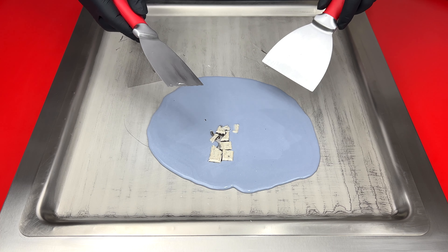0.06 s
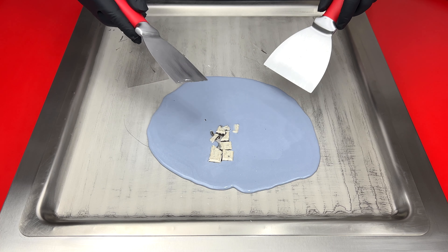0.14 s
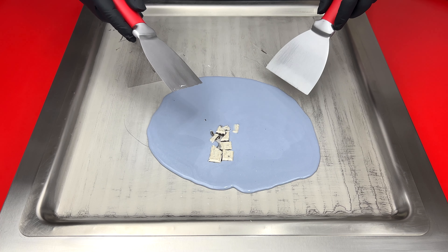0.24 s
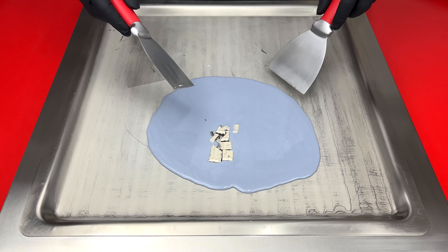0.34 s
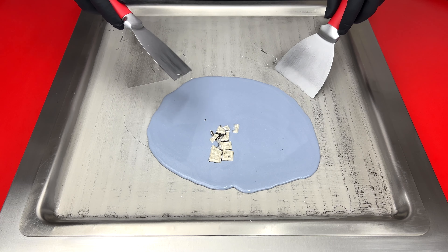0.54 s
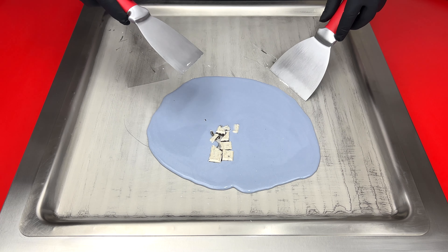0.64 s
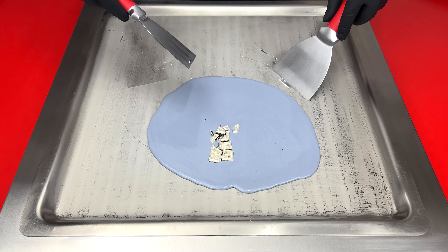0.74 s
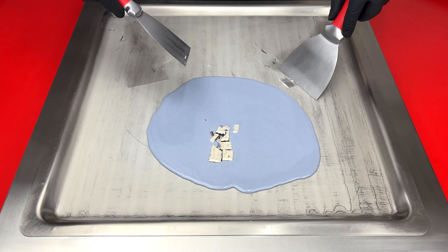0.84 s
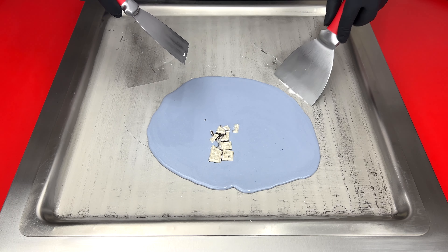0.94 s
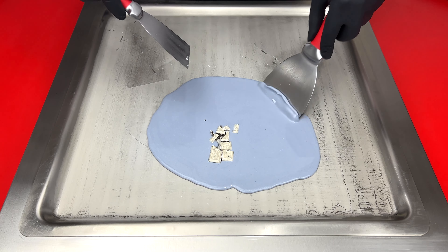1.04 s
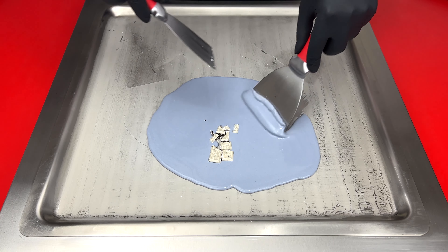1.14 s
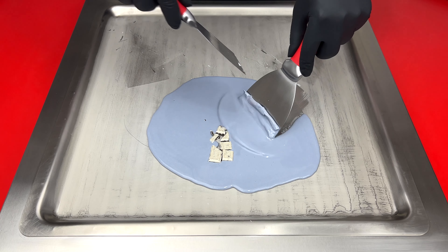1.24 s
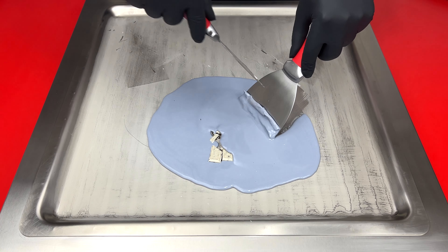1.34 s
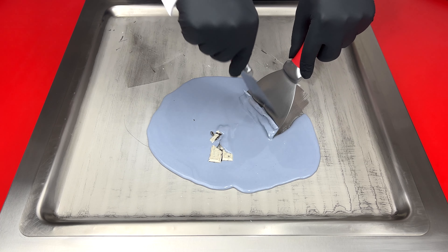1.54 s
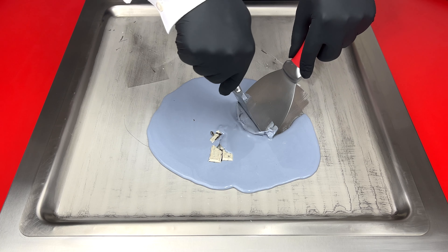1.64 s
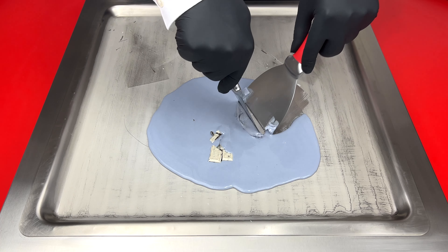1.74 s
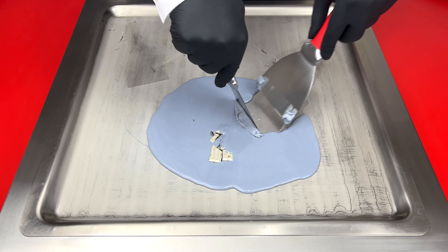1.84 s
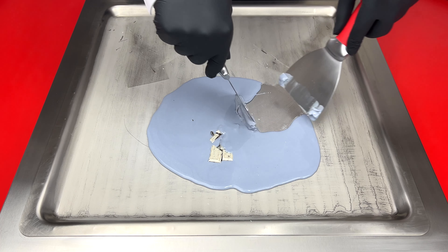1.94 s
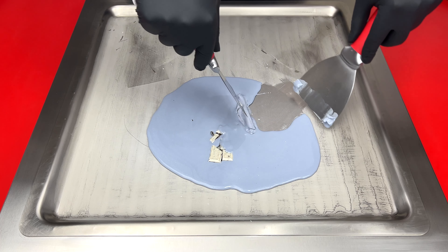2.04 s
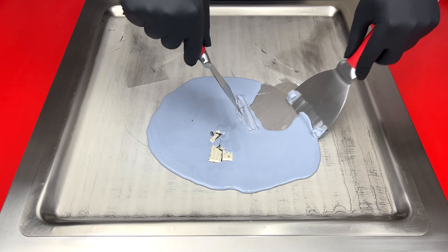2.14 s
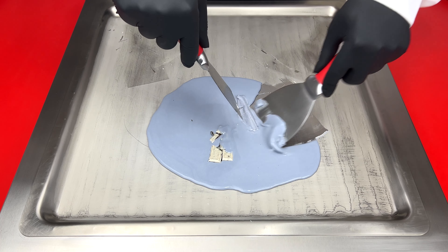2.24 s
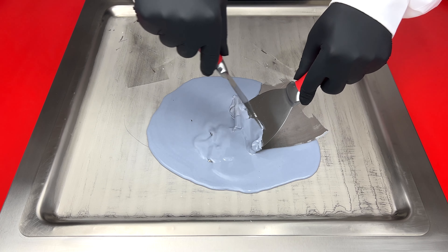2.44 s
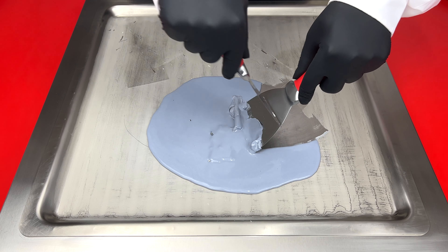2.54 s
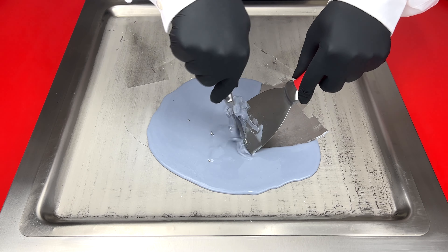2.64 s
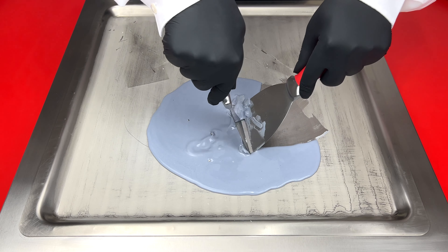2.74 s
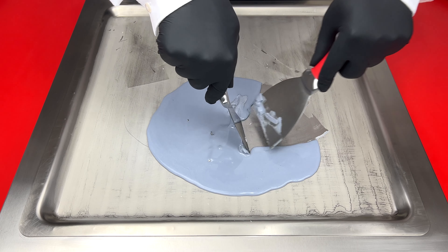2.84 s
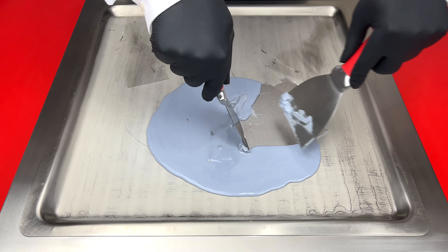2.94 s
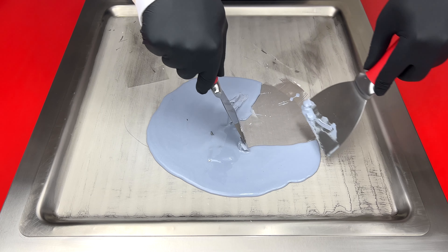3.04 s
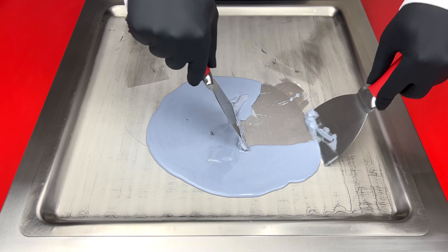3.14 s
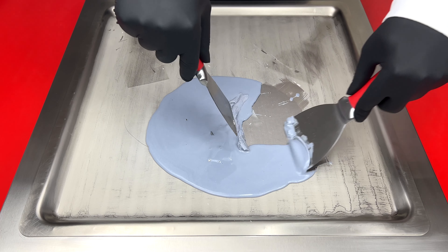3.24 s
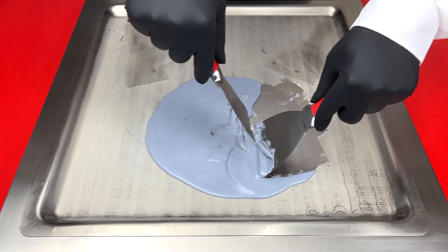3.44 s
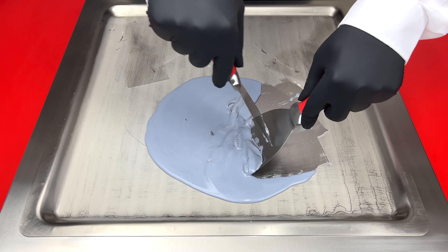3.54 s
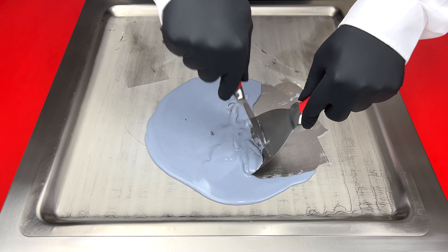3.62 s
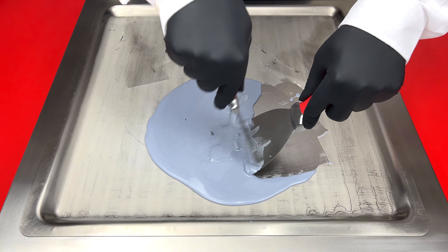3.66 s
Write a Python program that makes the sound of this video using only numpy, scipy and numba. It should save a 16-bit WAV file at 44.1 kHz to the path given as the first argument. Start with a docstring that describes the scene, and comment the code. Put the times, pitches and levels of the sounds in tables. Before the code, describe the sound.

Metal spatula blades tap, chop and scrape on a cold steel pan, recorded very close in stereo in a small room with short reflections. Light taps and thin scrapes open, then hard uneven clacks come in singles and quick pairs, strongest in the second half, before a gap and a final pair. Underneath runs a constant low compressor hum with fan noise and a thin faint whine.

```python
"""A compressor and fans hum and rush under a refrigerated pan, then two steel spatulas chop and scrape on its
frozen steel plate, close to a two-port microphone. Each blow is a noise tick and chatter, ringing blade modes
and a plate thud; each scrape is grainy noise partly ringing the blade. The machine is cabinet-shaped noise
with shaft and fan tones, a whine and faint whistles. The recorder's gain control ducks after loud blows."""
import sys
import numpy as np
from scipy import signal
from scipy.fft import rfft, irfft, next_fast_len
from scipy.io import wavfile
from scipy.ndimage import uniform_filter1d
from numba import njit

SR = 44100
rng = np.random.default_rng(int(sys.argv[2]) if len(sys.argv) > 2 else 0)


def persist_wave(psi):
    """Save psi, clipped to +-1, as 16-bit WAV."""
    counts = np.round(np.clip(psi, -1, 1) * 32767).astype(np.int16)
    wavfile.write(sys.argv[1], SR, np.atleast_2d(counts).T)


N = 373086  # samples


def undb(db):
    """Decibels to amplitude."""
    return 10 ** (np.asarray(db) / 20)


def level(x, db):
    """Bring a sound to unit rms, then apply a fixed or moving level in dB."""
    return x * undb(db) / np.sqrt(np.mean(x ** 2))


def at(table, hz):
    """Read (Hz, value) points on a log-frequency axis."""
    f, v = np.transpose(table)
    return np.interp(np.log(np.maximum(hz, 1)), np.log(f), v)


def shaped(x, gain):
    """Filter by a gain that is a function of frequency."""
    n = next_fast_len(x.shape[-1])
    hz = np.arange(n // 2 + 1) * SR / n
    return irfft(rfft(x, n) * gain(hz), n)[..., :x.shape[-1]]


def walk(rate):
    """Random levels held 1 / rate s and slewed twice; spread near 1."""
    k = int(SR / rate)
    held = np.repeat(rng.standard_normal(N // k + 1), k)
    return 1.3 * uniform_filter1d(uniform_filter1d(held, k), k)[:N]


def ring(modes, t, extra_db, stretch, phase):
    """Struck steel: a sum of exponentially decaying sines, their decay times multiplied by stretch."""
    hz, db, t60 = np.transpose(modes)[:, :, None]
    decay = np.exp(-np.log(1000) * t / (t60 * stretch))
    return (undb(db + extra_db) * np.sin(2 * np.pi * hz * t + phase) * decay).sum(0)


# blows: start_s, level_db, first_mode_hz (favoured), first_mode_lift_db, second_mode_hz (also favoured),
# then colour over 6.5 kHz: body_db (1.1 kHz), low_db (1.6 kHz), top_db (13 kHz),
# then chatter_ms (decay constant), thud_db, ring_db, ring_stretch (factor on the blade decay)
BLOWS = [(0.2681, -17, 1520, 9, 3770, 9, 5, -16, 5.4, -2, -13, 0.51),
         (0.5325, -23.5, 1860, 10, 4100, 17, 3, 0, 9.9, 3, -5, 2.1),
         (1.5147, -5.5, 1870, 11, 5630, 9.5, -3, -4.5, 5.8, -9, -9.5, 0.73),
         (1.533, -24, 2340, 15, 1870, 12, 8, -10, 4, -12, 1, 1.1),
         (1.6279, -12, 2050, 11, 3510, 11, 9, -25, 3, -2.5, -14, 0.72),
         (2.1166, -13.5, 1530, 6, 5400, 5, 6, -7, 3, 2, -9, 0.72),
         (2.581, -2, 2560, 7, 4870, -2, 3.5, -8, 3.3, -40, -14, 0.68),
         (2.596, -19, 1000, 9, 1500, 17, 15.5, -5, 4.4, -22, -10, 0.66),
         (2.662, -26, 2500, 6.7, 3530, 16, 12, 0, 4.6, -13, -1.5, .5),
         (2.6898, -16, 1006, 8.3, 3510, 20, 14.5, -9, 9.2, 5, -14, 0.53),
         (3.1676, -11, 1840, 7, 3080, -1, 0, -7, 2.7, -26, -9, 0.37),
         (3.6597, -31, 1530, 9, 4330, 6, 4, -0.5, 5, -21, -10, .8),
         (3.68, -11, 1750, 9, 5960, -6, 6.5, -1, 3.5, -34, -15, 0.64),
         (3.7305, -16, 1610, 9, 3160, -6, 10, -8, 4.3, -20, -17, 0.58),
         (4.117, -9.5, 1630, 7, 2560, -4, 9, -3, 5.6, -24, -14, .5),
         (4.5475, -2.5, 1620, 13, 4780, -3, -1, -3.5, 2.4, -39, -12.5, 0.56),
         (4.6197, -14, 950, 12, 2180, 14.5, 7, -2, 6.6, -1, -11.5, 1.4),
         (4.684, -15, 2050, 9, 6250, 11, 11.5, -3.5, 3.1, -24, -15.5, .7),
         (4.9849, -1.5, 1715, 11.5, 2520, 6, 8, 1, 3.7, -30, -9.5, 0.68),
         (5.0685, -7.5, 1500, 8.6, 2500, 6, 6, -5.5, 4.5, -16, -13, 0.8),
         (5.389, -2, 2720, 7.8, 1715, 7.5, 6, -5.5, 8.6, -15, -13, .8),
         (5.4821, -27.5, 1890, 5, 7430, 4, 5, 9, 5.8, 12, -3, 1),
         (5.757, -8, 1715, 7.7, 3800, 2, -1, -6, 1.6, -7, -7, 0.44),
         (5.8472, -4.5, 6950, 6.1, 5800, -3, -6, 0.5, 5.3, -11.5, -8, 0.69),
         (6.0702, -5, 2470, 11, 5470, 9, 7, -1, 2.8, -15, -11, 0.36),
         (6.091, -27, 2500, 6, 3700, 20, 16, -5, 4, -15, -2, .6),
         (6.158, -18.5, 5950, 8.2, 3870, 1, 3, 13.5, 5, -12, -7.5, 0.85),
         (6.684, 0.5, 1630, 8, 3860, 1, 5.5, 3.5, 7.5, -16.5, -10, 0.48),
         (6.707, -16.5, 1610, 8.3, 2700, 17, 15, -8, 5, -22, -5, 1),
         (6.753, -15, 1630, 5, 7200, 1, -1, 5, 5, -26, -15, 1),
         (8.1016, -12.5, 5650, 7, 5300, 0, -6, -3, 4.1, -30, -9, 0.83),
         (8.116, -31, 2620, 18, 1715, 17, 8, -7, 2.7, -13, 2, 2.2),
         (8.214, -10, 5500, 3.9, 6200, -11, -12, 8.5, 7.6, -18, -5.5, 1.4),
         (8.237, -31.5, 3155, 7.2, 3510, 1, 6, -10, 4, -20, 5.5, 3.1)]
# modes of the blades on the plate: pitch_hz, level_db, t60_s (before stretching)
BLADE_MODES = [(900, -8, .05), (1010, -8, .05), (1280, -9, .05), (1500, -8, .06), (1630, -10, .06),
               (1715, -5, .07), (1870, -8, .07), (2050, -8, .06), (2330, -9, .06), (2500, -8, .07),
               (2620, -9, .07), (2720, -9, .07), (2945, -11, .08), (3155, -11, .12), (3510, -11, .12),
               (3795, -9, .09), (4097, -9, .08), (4340, -10, .07), (4550, -11, .12), (4730, -10, .13),
               (4900, -10, .09), (5390, -9, .08), (5582, -9, .1), (5720, -9, .08), (5950, -10, .08),
               (6245, -10, .1), (6611, -10, .1), (6950, -10, .1), (7208, -11, .09), (7430, -11, .08),
               (8720, -13, .1), (11180, -7, .12), (11420, -10, .1), (12400, -11, .08), (13020, -11, .08),
               (15240, -13, .08), (15460, -12, .06)]
# thud modes of the plate: pitch_hz, level_db, t60_s (before shortening)
PLATE_MODES = [(184, 15, 0.095), (228, -4, 0.11), (300, 12.5, 0.072), (488, 2, 0.1), (838.4, -2.5, 0.23)]
SECOND_LIFT_DB = 5  # lift of the second favoured mode
TICK_DB, TICK_DB_PER_MS = -3.5, -0.5  # the shorter the chatter, the sharper the tick
MID_DB, MID_PER_LOW = -1, 0.28  # 3.3 kHz over 6.5 kHz follows the low share
LEAD = 256  # samples of room before a blow for the onset of its filter


def blows():
    """The corner ticks, the edge chatters for some ms, blade modes near the spot struck ring, the plate thuds.

    Three paths: common to both ports, scattered to the left, scattered to the right."""
    out, t = np.zeros((3, N + SR)), np.arange(SR // 2) / SR
    hz = np.array(BLADE_MODES)[:, :1]
    for (s, db, first_hz, first_lift_db, second_hz, body_db, low_db, top_db,
         chatter_ms, thud_db, ring_db, stretch) in BLOWS:
        chance = rng.standard_normal((len(BLADE_MODES), 5))
        lasting = max(chatter_ms, .2) / 1000
        contact = 1 - np.exp(-t / (0.39 * lasting))
        tick = undb(TICK_DB + TICK_DB_PER_MS * chatter_ms) * np.exp(-t / 0.0018)
        chatter = rng.standard_normal((3, len(t))) * (contact * np.exp(-t / lasting) + tick)

        # modes close to the two favoured pitches are lifted
        near_db = sum(lift * np.exp(-(np.log(hz / f) / .025) ** 2)
                      for f, lift in ((first_hz, first_lift_db), (second_hz, SECOND_LIFT_DB)))
        spot_db = near_db + 3 * chance[:, 1:2]
        # the grip and the load of ice bend the modes a little from blow to blow
        bent = np.array(BLADE_MODES) * np.c_[1 + .004 * chance[:, 0], np.ones((len(BLADE_MODES), 2))]
        # each path rings with its own phases
        rung = contact * np.array([ring(bent, t, spot_db, max(stretch, .2), 3 * chance[:, k:k + 1])
                                   for k in range(2, 5)])
        rung_rms = np.sqrt(np.mean(rung[:, :600] ** 2))
        hit = chatter / 1.77 + undb(ring_db) * rung / rung_rms / 3

        colour = [(500, body_db + 2.0), (1100, body_db), (1600, low_db),
                  (3300, MID_DB + MID_PER_LOW * low_db), (6500, 0), (13000, top_db)]
        # chatter and ring together lean towards the favoured modes, in dB
        lean = lambda f: sum(5.5 / (1 + ((f - mode) / (.04 * mode)) ** 2) for mode in (first_hz, second_hz))
        hit = np.pad(hit, ((0, 0), (LEAD, 0)))
        hit = shaped(hit, lambda f: undb(at(colour, f) + lean(f)))
        thud = undb(thud_db) * ring(PLATE_MODES, t, 0, 0.74, 0) * (1 - np.exp(-t / 0.039))
        i = int(s * SR)
        out[:, i - LEAD:i + len(t)] += undb(db) * hit
        out[:, i:i + len(t)] += undb(db) * thud
    return out[:, :N]


# scrape colour: pitch_hz, gain_db
RASP = [(600, -4), (1500, 5.5), (3000, 0.5), (6000, 4), (9000, 1.5), (12000, 0.5), (14000, -3.5),
        (16000, -4)]
# strokes: start_s, length_s, level_db, change_db (over the stroke), top_db (treble gain within the stroke)
STROKES = [(0.269, 0.046, -32, -6, -27), (0.54, 0.15, -43, -2, -3), (0.77, 0.072, -41.5, 3, 1.5),
           (0.987, 0.092, -34.5, -2.5, 4), (1.127, 0.068, -32.5, 1.5, -5), (1.536, 0.065, -36.5, 2, 4),
           (2.13, 0.037, -43, -1, 1), (2.198, 0.1, -30.5, -2, 4.5), (2.597, 0.087, -39.5, 0, 6),
           (3.185, 0.18, -39, 3, 7), (3.401, 0.11, -38, 1.5, 1.5), (3.687, 0.1, -34.5, -11, 6.5),
           (4.142, 0.17, -29, -9, 10), (4.602, 0.16, -33, -7, -6), (4.997, 0.07, -30, -7, -8),
           (5.404, .06, -27.5, -12, -11), (5.794, 0.061, -41.5, 5, 1), (6.092, 0.067, -42, 3, -5),
           (6.706, 0.044, -18, -12, -18), (8.116, 0.16, -38, -2.5, 5.5)]
PRESS_DB_PER_S, LIFT_DB_PER_S = 550, 298  # how fast the hiss comes as the edge presses and goes as it lifts
UNEVEN_DB, PATCHY_DB = 2.2, 2.5  # wavering hand pressure; grit favouring now one octave, now another


def scrape():
    """Dense slips of the edge over ice: grainy noise, part of it ringing the damped blade."""
    t = np.arange(N) / SR
    grain_db = 2.6 * rng.exponential(size=N) + 1.8 * walk(70) + UNEVEN_DB * walk(18)
    slips = rng.standard_normal((3, N)) * undb(grain_db)
    blade_ring = ring(BLADE_MODES, t[:SR // 8], 0, 0.52, 0)
    blade = signal.fftconvolve(slips, blade_ring[None], axes=1)[:, :N]
    mixed = level(slips, 0) + level(blade, -6.5)
    rasp = level(shaped(mixed, lambda hz: undb(at(RASP, hz))), 0)

    # overlapping octave bands, each with its own wavering level
    octaves = [lambda hz, f=f: np.cos(np.pi / 2 * np.clip(np.log2(np.clip(hz, 1500, 12000) / f), -1, 1)) ** 2
               for f in 1500 * 2 ** np.arange(4)]
    rasp = level(sum(undb(PATCHY_DB * walk(28)) * shaped(rasp, band) for band in octaves), 0)
    top = shaped(rasp, lambda hz: 1 / (1 + (8200 / np.maximum(hz, 1)) ** 5))

    body, shine = 0, 0
    for s, length, db, change_db, top_db in STROKES:
        held_db = db + change_db * np.clip((t - s) / length, 0, 1)
        rise_db = PRESS_DB_PER_S * np.maximum(s - t, 0)
        fall_db = LIFT_DB_PER_S * np.maximum(t - s - length, 0)
        press = undb(held_db - rise_db - fall_db)
        body = body + press
        shine = shine + press * (undb(top_db) - 1)
    return body * rasp + shine * top


def scatter(x, t60):
    """Room reflections: spread a sound by a burst of decaying noise of unit energy."""
    t = np.arange(int(t60 * SR)) / SR
    tail = rng.standard_normal(SR)[:len(t)] * np.exp(-np.log(1000) * t / t60)
    return signal.fftconvolve(x, tail / np.sqrt(np.sum(tail ** 2)))[:N]


# what the two ports have in common: pitch_hz, shared_power (0 to 1)
LIKENESS = [(60, 0.93), (180, 0.97), (300, 0.36), (600, 0.55), (1500, 0.13), (4000, 0.084), (7000, 0.015),
            (9500, 1), (16000, 1)]
# delay of the left port: pitch_hz, lag_rad
PORT_LAG = [(0, 0), (1500, 3.0), (2700, 6.3), (4000, 5.3), (5500, 9.4), (6500, 12.3), (8200, 12.8),
            (10150, 15.7), (13800, 22.0), (17000, 27.5)]


def ports(direct, left, right):
    """One sound reaches both ports, the left later; below the treble each also has its own scattered share."""
    f, lag = np.transpose(PORT_LAG)
    same = lambda hz: np.clip(at(LIKENESS, hz), 0, 1)
    apart = shaped(np.array([left, right]), lambda hz: np.sqrt(1 - same(hz)))
    late = shaped(direct, lambda hz: np.sqrt(same(hz)) * np.exp(-1j * np.interp(hz, f, lag)))
    prompt = shaped(direct, lambda hz: np.sqrt(same(hz)))
    return apart + [late, prompt]


# resonances of the cabinet: pitch_hz, width_hz, level_db (over the broad rush)
CABINET = [(28, 6.5, 4), (61, 4.6, -2), (87.3, 7.6, 11), (123.2, 8.5, 10.5), (130.3, 18.5, 19),
           (126.2, 3, 23.5), (162, 1.4, 22), (175, 12.4, 18), (233.5, 19, 10.5), (272, 22, 9),
           (312.5, 29, 13), (337, 2.4, 6.5), (450, 44, 5), (543, 72, 3.5), (682, 125, 5.5), (838, 68, 9),
           (946, 73, 8.5), (5720, 2660, 4)]
# colour of the broad fan rush: pitch_hz, gain_db
RUSH = [(20, -22), (45, -5), (70, -4.5), (200, -1), (400, 0), (950, -6), (1200, -5.5), (2500, -15),
        (4500, -25.5), (6500, -32), (9000, -32.5), (10500, -37), (13000, -46.5), (16000, -44)]


def cabinet(hz):
    """Gain of the cabinet: broad rush with resonances on it, summed in power."""
    peaks = sum(undb(2 * db) / (1 + (2 * (hz - f) / w) ** 2) ** 2 for f, w, db in CABINET)
    return undb(at(RUSH, hz)) * np.sqrt(1 + peaks)


# compressor shaft tones: multiple (of shaft speed), level_db (before SHAFT_DB), start_phase_rad
SHAFT_TONES = [(1, -37.5, 0), (3, -31, 3.5)]
# tones of the slightly faster fan, beating with the shaft: multiple (of fan speed), level_db, start_phase_rad
FAN_TONES = [(1, -42, 0), (3, -25.5, 1.2)]
# fan speed before its small waver: time_s, speed_hz (turns a second)
FAN_HZ = [(0, 59.5), (1.9, 59.5), (2.2, 59.62), (4.2, 59.62), (4.8, 59.46), (8.46, 59.45)]
# the shaft tones sink and return: time_s, change_db
SHAFT_DB = [(0, 2.5), (2.8, 3), (4.6, 1.5), (5.1, -7), (8.46, 6)]
# rotor whine: multiple (of shaft speed), level_db (balance between the lines)
WHINE = [(71, -9), (72, -5), (73, -2), (74, 0), (75, -9), (76, -9)]
# level of the whole whine: time_s, level_db
WHINE_DB = [(0, -51), (1.8, -50.5), (2.4, -48.5), (3.4, -52), (5.3, -51), (8.46, -49)]
RUSH_DB, SHAFT_HZ = -20, 58.52  # rms level of the rush; mean shaft speed, turns a second
WHINE_DRIFT_DB = 2  # each line of the whine swells on its own


def machine():
    """Fan rush, shaft and fan tones, and a rotor whine of neighbouring shaft multiples; speeds waver a little."""
    t = np.arange(N) / SR
    common, left, right = level(shaped(rng.standard_normal((3, N)), cabinet), RUSH_DB)
    turns = 2 * np.pi * np.cumsum(SHAFT_HZ * (1 + .0003 * walk(1.5))) / SR
    fan_hz = np.interp(t, *np.transpose(FAN_HZ))
    spins = 2 * np.pi * np.cumsum(fan_hz * (1 + .0003 * walk(1.5))) / SR
    shaft_change_db = np.interp(t, *np.transpose(SHAFT_DB))
    tones = sum(level(np.sin(k * angle + start), db + change_db + 0.31 * walk(1.85))
                for angle, table, change_db in ((turns, SHAFT_TONES, shaft_change_db), (spins, FAN_TONES, 0))
                for k, db, start in table)
    # k * k spreads the starting phases of the lines
    whine = sum(undb(db + WHINE_DRIFT_DB * walk(1.2)) * np.sin(k * turns + k * k + .3 * walk(30))
                for k, db in WHINE)
    whine = level(whine, np.interp(t, *np.transpose(WHINE_DB))) + whistles()
    # the whine also feeds the left port's own share
    return ports(common + tones + whine, left + whine, right)


# faint thin whistles: start_s, end_s, pitch_hz, level_db (before fading and wavering)
WHISTLES = [(.4, .7, 5130, -55), (1.15, 1.55, 5100, -53), (1.6, 3.6, 5450, -52), (2.8, 3.2, 5270, -56),
            (2.75, 3.15, 8400, -63)]


def whistles():
    """Thin sines, wavering in pitch and level, that fade in and out."""
    t, out = np.arange(N) / SR, 0
    for start, end, hz, db in WHISTLES:
        fade = np.interp(t, [start, start + 0.059, end - .1, end], [0, 1, 1, 0])
        tone = np.sin(2 * np.pi * np.cumsum(hz * (1 + .002 * walk(60))) / SR)
        out = out + fade * level(tone, db + 2.5 * walk(12))
    return out


ROOM_T60_S, ROOM_DB = 0.14, -3.5


def scene():
    """Spatulas and their short room reach the two ports over the steady machine."""
    tools = blows() + scrape()
    room = np.array([scatter(path, ROOM_T60_S) for path in tools])
    return ports(*(tools + undb(ROOM_DB) * room)) + machine()


@njit
def follow(x, attack, release):
    """Peak follower: quick to rise, slow to fall."""
    e, out = 0., np.empty(len(x))
    for i in range(len(x)):
        e += (x[i] - e) * (attack if x[i] > e else release)
        out[i] = e
    return out


# colour difference of the ports: pitch_hz, left_minus_right_db
BALANCE_DB = [(60, -1), (200, -.5), (380, 4), (700, 0), (1300, 2.5), (2400, 2), (4400, 5), (7000, 4),
              (9500, 0), (16000, 0)]
# treble roll-off of the microphone: pitch_hz, gain_db
MIC_TOP = [(15650, 0), (15900, -15)]
TOP_HZ = 16700  # final low-pass edge


def record(dry):
    """The ports differ in colour; gain control turns loud peaks down and recovers slowly; the top is cut."""
    half = np.array([[.5], [-.5]])  # left up, right down
    dry = shaped(dry, lambda hz: undb(half * at(BALANCE_DB, hz) + at(MIC_TOP, hz)))
    # attack 3.4 ms, release 150 ms
    peak = follow(np.abs(dry).max(0), 1 / (0.0034 * SR), 1 / (.15 * SR))
    # gentle compression above -10.5 dB
    gain = np.minimum(undb(-10.5) / (peak + 1e-9), 1) ** 0.14
    low_pass = signal.ellip(8, .2, 70, TOP_HZ, fs=SR, output="sos")
    return signal.sosfilt(low_pass, np.clip(dry * gain, -1, 1))


dry = scene()
out = record(dry)
persist_wave(out)
```